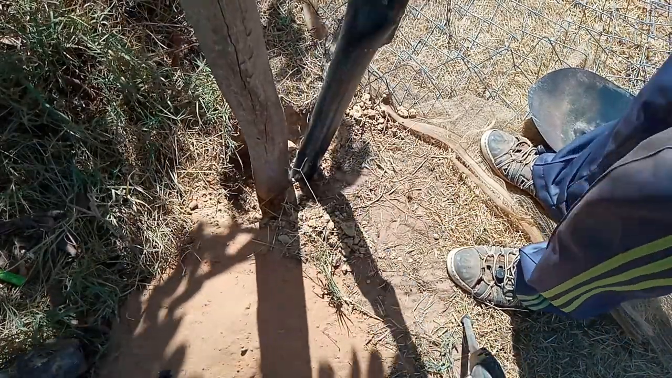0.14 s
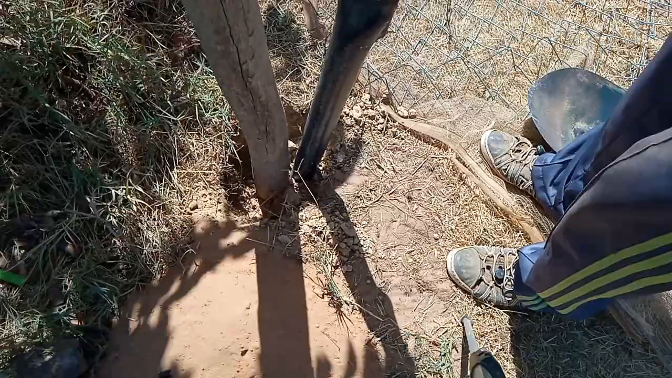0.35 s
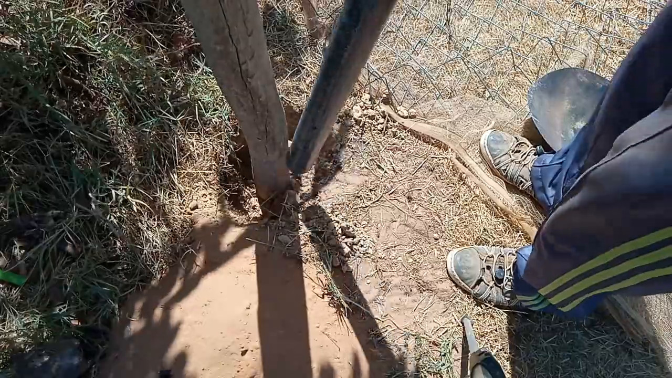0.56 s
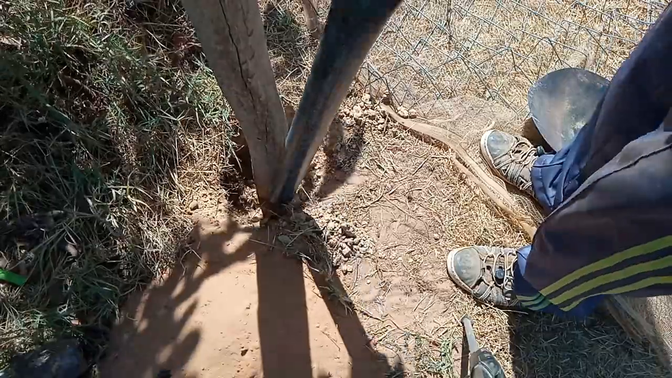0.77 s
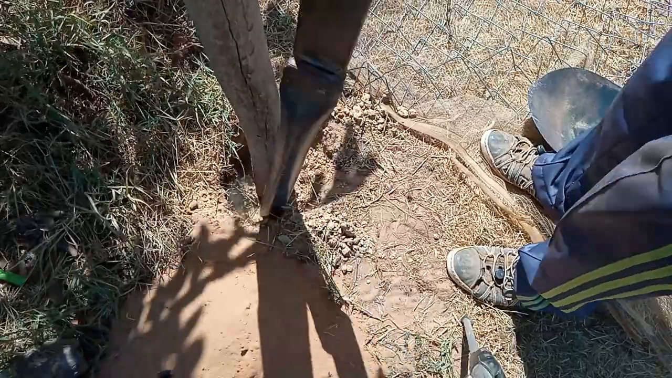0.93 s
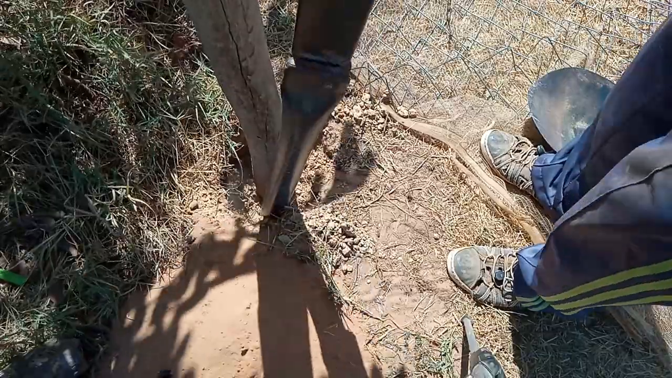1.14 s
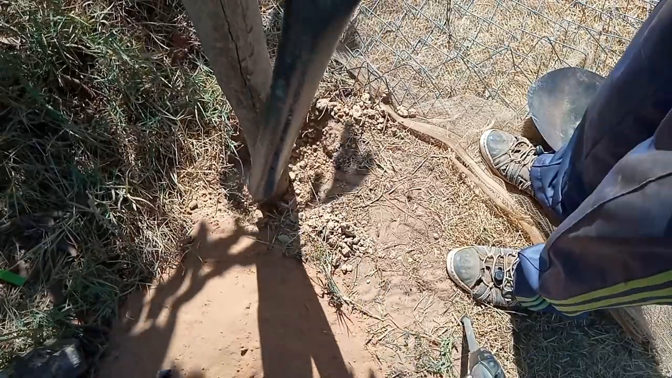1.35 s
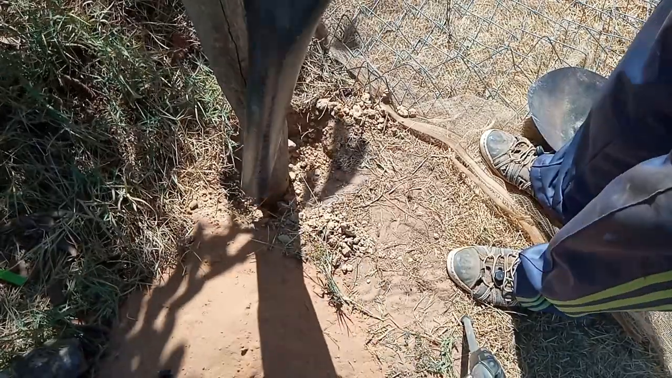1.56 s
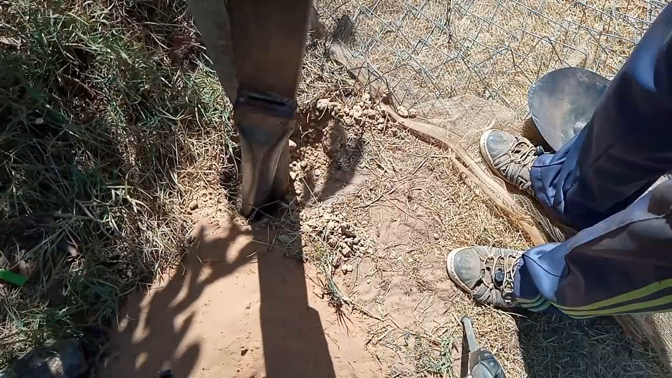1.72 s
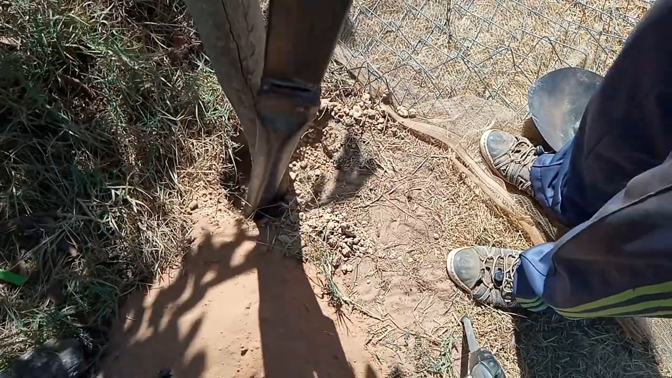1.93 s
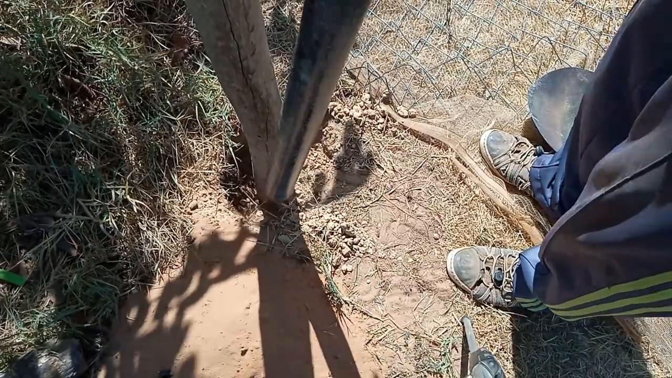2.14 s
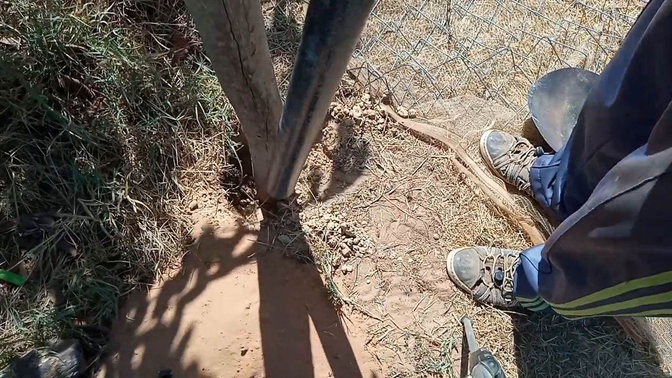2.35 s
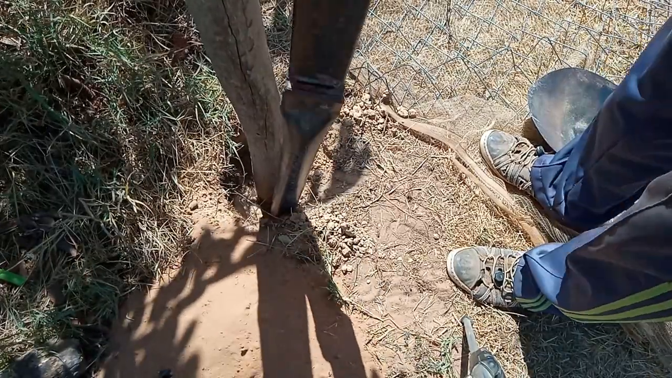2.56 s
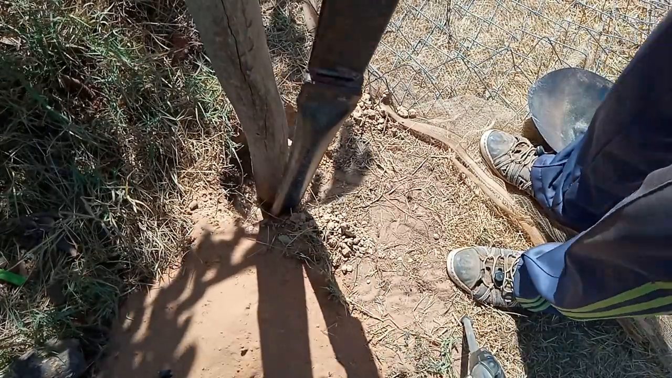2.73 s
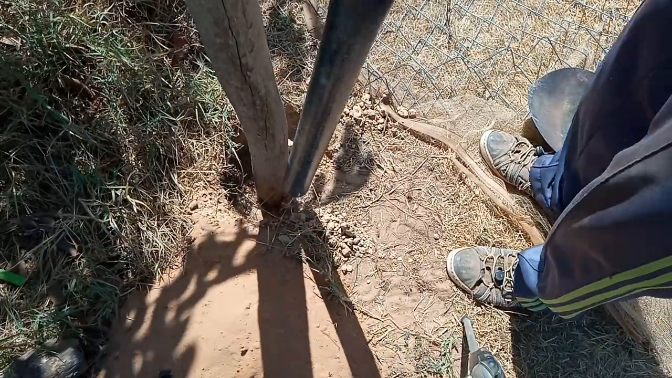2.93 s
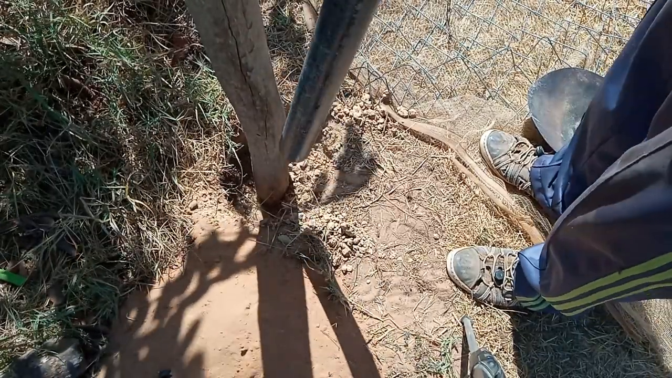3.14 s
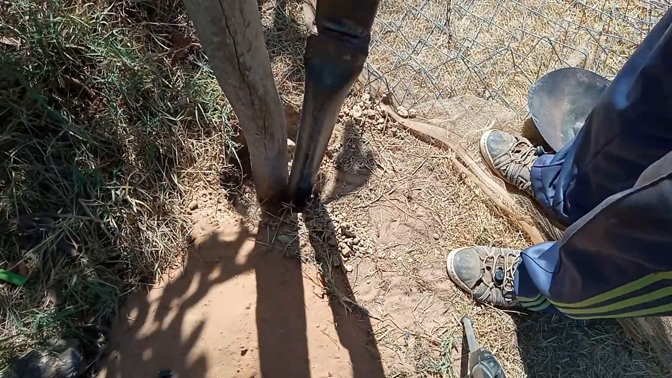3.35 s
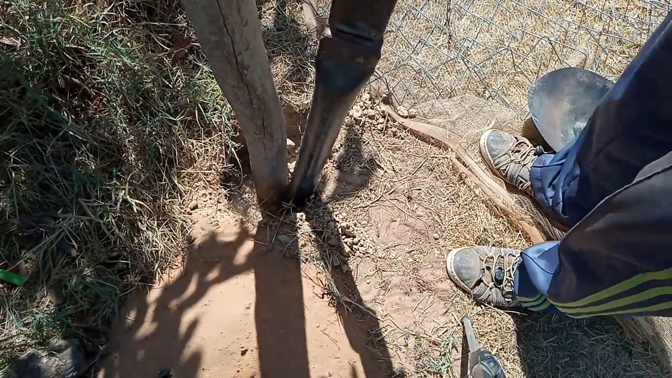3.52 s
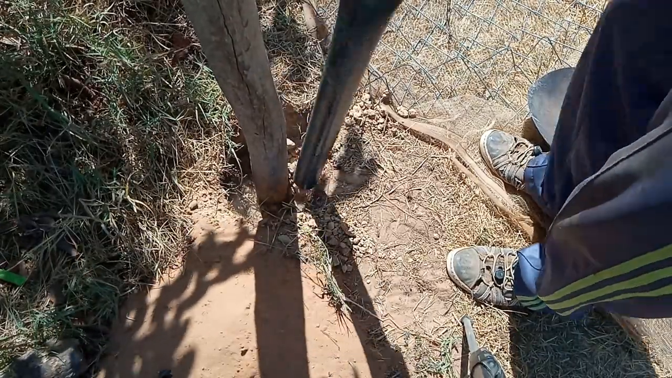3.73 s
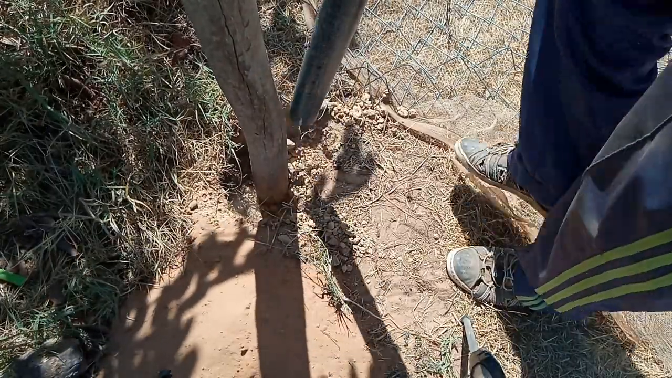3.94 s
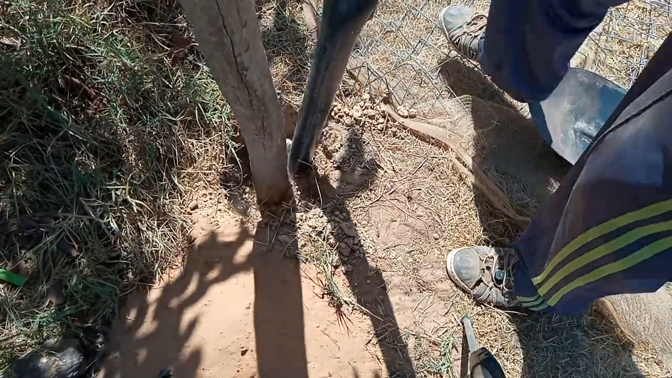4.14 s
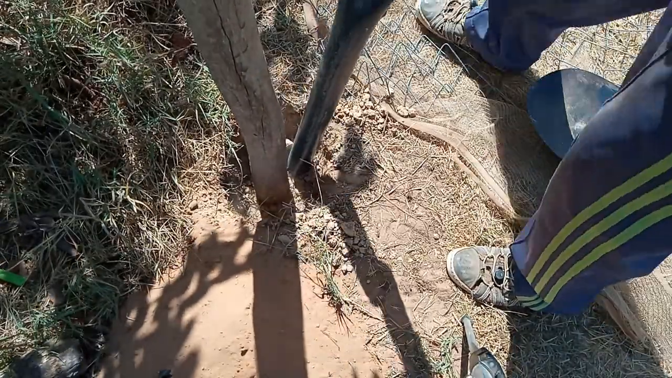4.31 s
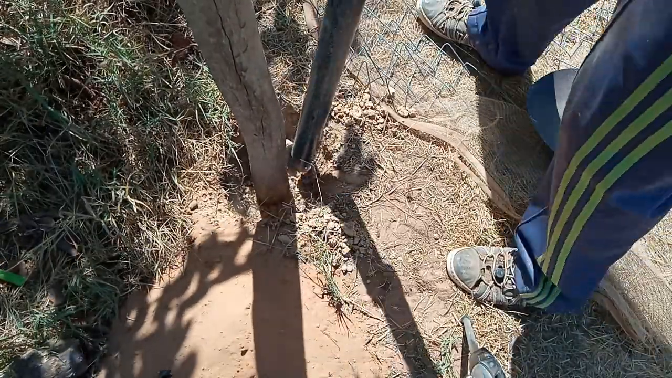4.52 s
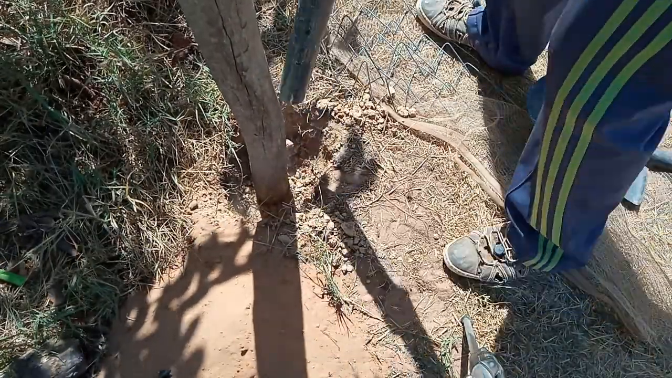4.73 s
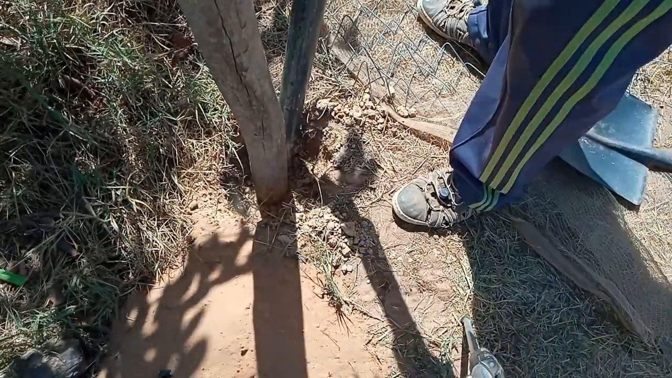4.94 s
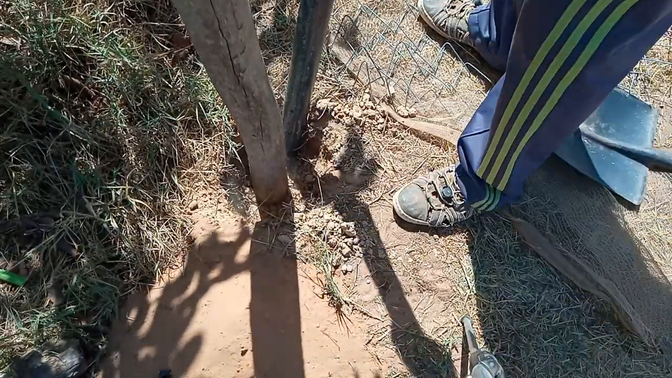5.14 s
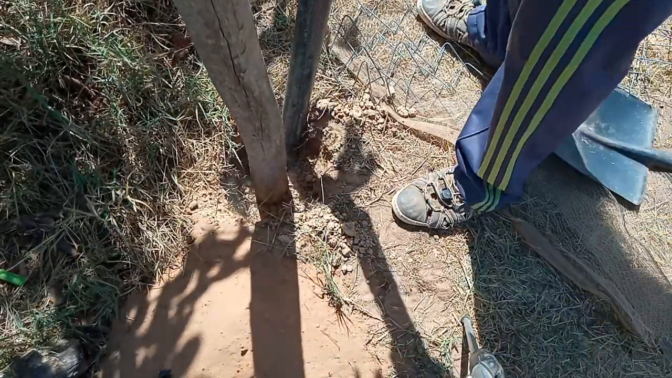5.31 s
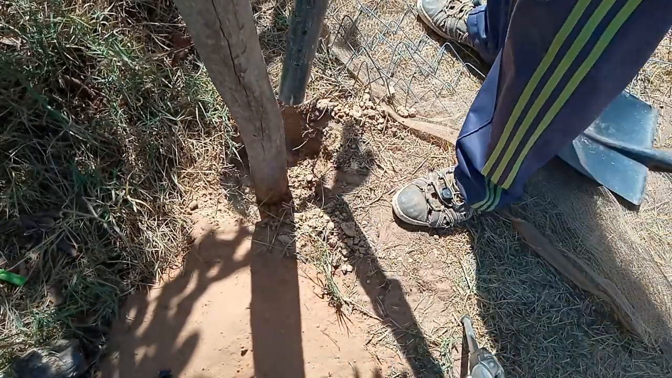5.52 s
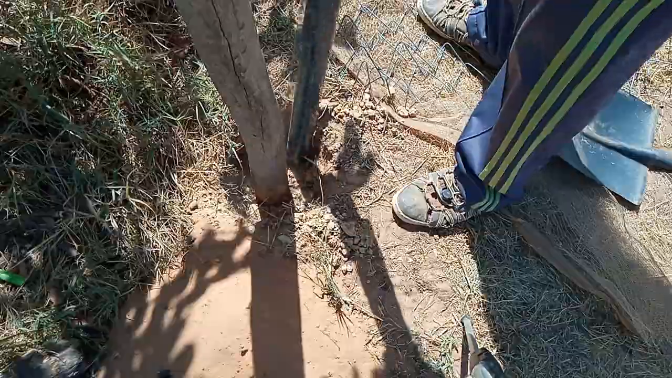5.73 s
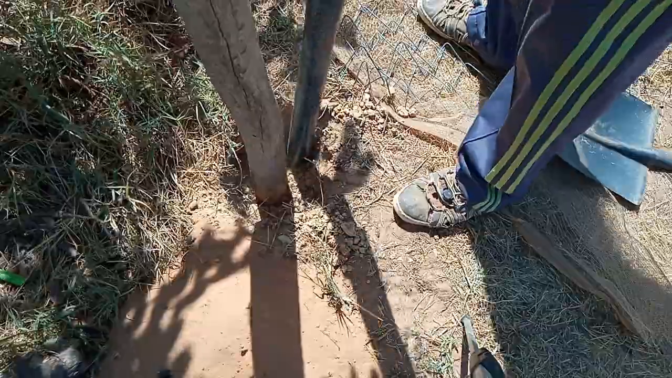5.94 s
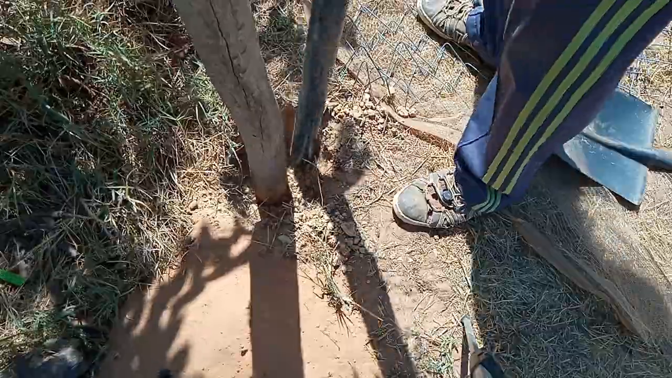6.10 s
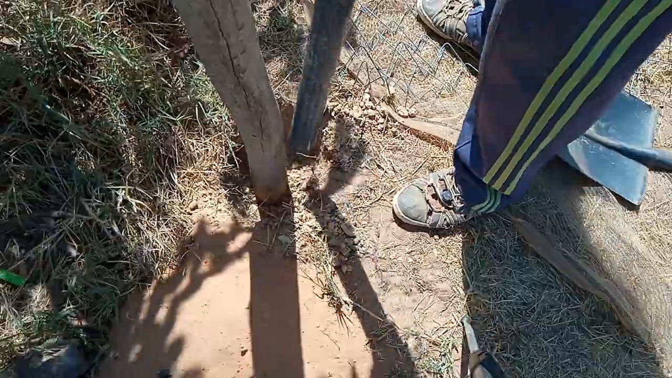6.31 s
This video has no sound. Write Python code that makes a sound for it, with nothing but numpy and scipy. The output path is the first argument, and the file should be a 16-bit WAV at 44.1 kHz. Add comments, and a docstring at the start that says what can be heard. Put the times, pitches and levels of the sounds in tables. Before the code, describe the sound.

Eight or so dry, crunchy metal-on-soil blows, some as quick doubles, land roughly every 0.8 seconds with almost no echo. Between them come soft gritty scrapes and tiny clicks. Lumpy wind thumps the microphone early and fades to calm. A rough warbler and fast falling trills open the scene, another trill follows near the middle, fainter ones later. A shoe scuffs a shovel along the ground after the fifth blow, over quiet grass hiss and a faint hum.

```python
"""Beside a wooden post in dry stony ground, a steel bar tamps the soil: filtered spiky noise rings its modes
and crunches. Blows crack and thud, a sharp tick sounds, tools and stones click, the bar scrapes on its way up,
a shoe drags a shovel in stuttering slides. Gliding sines make a trilling bird, a warbler and thin far whistles;
short wavelets and low noise buffet the microphone. Behind them lie a patchy noise hiss of grass and a narrow-
band far drone."""
import sys
import numpy as np
from scipy import signal
from scipy.fft import rfft, irfft, next_fast_len
from scipy.io import wavfile
from scipy.ndimage import uniform_filter1d, map_coordinates

SR = 44100
rng = np.random.default_rng(int(sys.argv[2]) if len(sys.argv) > 2 else 0)


def unload_audio(sound):
    """Save the sound as a 16-bit wav file, at the path given as the first command line argument."""
    columns = np.transpose(np.atleast_2d(sound))
    # keep every value between -1 and 1, then stretch to whole-number steps
    steps = np.round(np.clip(columns, -1, 1) * 32767)
    wavfile.write(sys.argv[1], SR, steps.astype(np.int16))


N = 280917  # length [samples]


def amp(db):
    """Decibels to gain."""
    return 10 ** (np.asarray(db) / 20)


def unit(x):
    """Scaled to rms 1."""
    return x / np.sqrt(np.mean(x ** 2) + 1e-20)


def along(points, hz):
    """Gain read from (frequency [Hz], level [dB]) points on a log frequency axis."""
    f, db = np.transpose(points)
    return amp(np.interp(np.log(hz + 1), np.log(f), db))


def curve(rows):
    """One value per sample from (time [s], value) rows."""
    return np.interp(np.arange(N) / SR, *np.transpose(rows))


def wobble(rate, size=N):
    """A smooth random curve with this many knots a second."""
    knots = rng.standard_normal(int(size * rate / SR) + 4)
    return map_coordinates(knots, [np.arange(size) * rate / SR])


def filtered(x, response):
    """Sound shaped by a real or complex response of frequency."""
    m = next_fast_len(len(x) + 8192)
    return irfft(rfft(x, m) * response(np.fft.rfftfreq(m, 1 / SR)), m)[:len(x)]


def add(out, s, x):
    """Mixes x into out from time s."""
    part = out[max(round(s * SR), 0):][:len(x)]
    part += x[:len(part)]


def third_of_a_second():
    """Time axis of one contact [s]."""
    return np.arange(SR // 3) / SR


MODE_SPREAD_DB = 2  # how much a mode's strength differs from contact to contact


def modes(table, f):
    """Causal resonances of alternating sign, at new strengths for each contact."""
    total = 0
    for k, (centre, width, db) in enumerate(table):
        strength = (-1) ** k * amp(db + rng.normal(0, MODE_SPREAD_DB))
        total = total + strength * 1j * f * width / (centre * centre - f * f + 1j * f * width)
    return total


FAVOUR_OCTAVES = 0.24  # half width of the lift or cut that the point of contact gives near one pitch
# spectrum of crunching soil: (frequency [Hz], relative level [dB])
SOIL_SPECTRUM = [(80, -8.5), (200, -16), (600, -12), (1500, -14.5), (3500, -19), (5000, -22.5), (8000, -25),
                 (11000, -46)]


def contact(shape, body, db, soil_db, tilt_db, grit, favoured_hz=1, favour_db=0):
    """Stones cracking against steel: spiky noise that rings the tool and is heard as crunch."""
    spikes = np.exp(grit * wobble(903, size=len(shape)))
    cracks = shape * unit(rng.standard_normal(len(shape)) * spikes)

    def heard(f):
        octaves_off = np.log2((f + 1) / favoured_hz)
        favour = favour_db * np.exp(-(octaves_off / FAVOUR_OCTAVES) ** 2)
        tilt = amp(tilt_db * np.log2(np.clip(f, 300, 5000) / 1700) + favour)
        radiated = 1 / (1 + (f / 5200) ** 4)  # far above the modes little is heard
        ring = amp(20.0) * modes(body, f) * radiated
        crunch = amp(soil_db + 13.5) * along(SOIL_SPECTRUM, f)
        return tilt * (ring + crunch)

    return amp(db) * filtered(cracks, heard)


BITE_S = .0004  # rise time constant [s]
CRACK, CRACK_S = 1.6, .003  # first crack over the crunch [ratio], and its decay time constant [s]


def grind(length):
    """Envelope of a bite: a sharp first crack, steady grinding, then a soft stop."""
    t = third_of_a_second()
    bite = 1 - np.exp(-t / BITE_S)
    crack = 1 + CRACK * np.exp(-t / CRACK_S)
    stop = 1 + np.exp(np.clip((t - length) / (0.1 * length + 0.0013), -50, 50))
    return bite * crack / stop


THUD_DB, THUD_HZ, THUD_T60 = -7.5, 179, 0.16  # level against the blow's force [dB], pitch [Hz], 60 dB decay [s]


def thud(db):
    """The ground's dull answer to a blow: decaying noise around a low pitch."""
    t = third_of_a_second()
    low = unit(filtered(rng.standard_normal(len(t)), lambda f: 1 / (1 + np.log2((f + 1) / THUD_HZ) ** 4)))
    return amp(db + THUD_DB - 60 * t / THUD_T60) * (1 - np.exp(-t / 0.011)) * low


GRIT = .42  # how spiky the crunch of a blow is
FADE_DB = 4  # a blow's crunch weakens by this much over its length [dB]
# ringing modes of the steel bar: (centre [Hz], width [Hz], relative level [dB])
BAR_MODES = [(560, 45, -19), (855, 41, -11.5), (1225, 25, -16.5), (1490, 33, -9), (1725, 37.5, -5.5),
             (1950, 55, -10), (2280, 53, -16.5), (2740, 63, -13), (3134, 49, -15), (3550, 36.5, -11.5),
             (4100, 31, -20.5)]
# bites of the bar, light touches and full blows: (time [s], force [dB], crunch length [s], share of soil [dB],
# treble slope [dB per octave], pitch lifted or damped [Hz], lift or damping [dB])
BAR_BLOWS = [(0.759, -21.5, 0.051, -15, -6, 1225, 10), (0.812, -6, 0.051, -3, -3, 3210, 5.5),
             (1.588, -19.5, 0.025, -14, -8.5, 1930, 3), (1.632, -15.5, 0.03, -5, -1, 1725, 8.5),
             (2.48, -2.5, 0.023, -5, -3.5, 3550, -2), (3.288, -7, 0.019, -3, -6, 1830, -13),
             (3.318, -7.5, 0.029, -3, -0.5, 1725, 5), (4.127, -6, 0.025, -4, -1, 3060, 12),
             (4.932, -30.5, 0.02, 12, -3, 855, 2), (4.955, -4.5, 0.024, -6, -1.5, 1980, -2.5),
             (5.695, -26, 0.042, 1.5, -6.5, 590, 7.5), (5.755, -20.5, 0.016, -8, 1, 1725, 7),
             (5.764, -7.5, 0.012, 1.5, -2, 2740, 12)]


def blows():
    """The bar bites the crust: each blow cracks, grinds, rings and thuds."""
    out, t = np.zeros(N), third_of_a_second()
    for s, db, length, soil_db, tilt_db, favoured_hz, favour_db in BAR_BLOWS:
        shape = grind(length) * amp(-FADE_DB * t / length)
        add(out, s, contact(shape, BAR_MODES, db, soil_db, tilt_db, GRIT, favoured_hz, favour_db))
        add(out, s, thud(db))
    return out


# the bar drawn up through loose soil: (middle [s], half length [s], force [dB])
BAR_SCRAPES = [(0.413, 0.15, -33.5), (1.122, 0.058, -29.5), (1.952, 0.093, -34), (2.804, .07, -28.5),
               (3.644, 0.1, -31)]


def scrapes():
    """The bar rubs past loose soil on its way up, swelling and fading."""
    out, t = np.zeros(N), third_of_a_second()
    for s, half, db in BAR_SCRAPES:
        swell = np.cos(np.pi / 2 * np.clip((t - half) / half, -1, 1))
        add(out, s - half, contact(swell, BAR_MODES, db, soil_db=-7.5, tilt_db=1.0, grit=0.23))
    return out


# small gritty clicks, a sharp tick first, then clicks of tools and stones: (time [s], force [dB], length [s])
GRITTY_CLICKS = [(0.459, -27, 0.002), (3.818, -44.5, 0.012), (4.531, -32, .003)]


def clicks():
    """Small gritty clicks: brief spiky noise with much soil in the sound."""
    out = np.zeros(N)
    for s, db, length in GRITTY_CLICKS:
        add(out, s, contact(grind(length), BAR_MODES, db, soil_db=10.5, tilt_db=2.0, grit=0.37))
    return out


JERK_S = 0.0035  # time constant of a slide's start [s]
# ringing modes of the shovel: (centre [Hz], width [Hz], relative level [dB])
SHOVEL_MODES = [(1110, 50, 4), (1740, 40, -5), (2130, 42, -6), (3560, 26, 2), (3980, 60, -5)]
# the shovel jerks and slides to rest: (time [s], length [s], force [dB])
SHOVEL_DRAGS = [(4.172, 0.095, -29.5), (4.22, 0.17, -28), (4.505, 0.093, -36.5)]


def drags():
    """A shoe drags the shovel: a quick start, then a stuttering slide that dies away."""
    out, t = np.zeros(N), third_of_a_second()
    for s, length, db in SHOVEL_DRAGS:
        slide = (1 - np.exp(-t / JERK_S)) * np.clip(1 - t / length, 0, 1) ** 0.88
        stutter = slide * amp(1.6 * wobble(56.3, size=len(t)))
        add(out, s, contact(stutter, SHOVEL_MODES, db, soil_db=7.5, tilt_db=2.0, grit=0.35))
    return out


EDDIES = 170  # weaker eddies, scattered through the whole time
EDDY_DB, EDDY_SPREAD_DB = 8.5, 3.5  # their strength over the buffet level and its scatter [dB]
EDDY_TOP_DB = -5  # ceiling of their strength [dB]
# buffeting: (time [s], level [dB])
BUFFET = [(0.0, -17.5), (0.39, -20), (0.67, -10), (.94, -16.5), (1.18, -7.5), (1.26, -19.5), (1.34, -12),
          (1.88, -20.5), (2.05, -14.5), (2.54, -28), (2.86, -40), (3.16, -42.5), (3.46, -20), (4.03, -23),
          (4.2, -40), (4.91, -48.5), (6.12, -40.5), (6.37, -22)]
# spectrum of the buffeting: (frequency [Hz], relative level [dB])
BUFFET_SPECTRUM = [(25, -34), (60, 4), (110, 6), (240, -11), (430, -50.5), (900, -79.5)]
# the strongest eddies slapping the port: (time [s], level [dB])
SLAPS = [(0.249, -1.5), (0.457, 1), (0.572, -1), (0.73, 2.5), (.982, 0), (1.002, 2), (1.08, 0.5),
         (1.114, 0), (1.143, 0), (1.182, 6), (1.295, 2.5), (1.313, 2.5), (1.361, 1), (1.402, 0),
         (1.443, -5.5), (1.493, 0.5), (1.763, -0.5), (2.074, 0), (2.135, -2), (2.219, -4.5), (2.274, -6),
         (3.864, -8.5), (6.228, -9.5)]


def wind():
    """Lumpy turbulence at the port, with single eddies as short wavelets, tending quicker and sharper when strong."""
    buffet_db, lumps = curve(BUFFET), amp(4.73 * wobble(25))
    rumble = filtered(rng.standard_normal(N), lambda f: along(BUFFET_SPECTRUM, f))
    out = amp(buffet_db) * unit(lumps * rumble)
    # strong gusts flutter higher
    flutter = filtered(rng.standard_normal(N), lambda f: f / 380 / (1 + (f / 380) ** 6.2))
    out += amp(2.26 * buffet_db + 3) * unit(lumps ** 1.5 * flutter)
    # one eddy at a random place in each equal slot
    at = ((np.arange(EDDIES) + rng.random(EDDIES)) * N / EDDIES).astype(int)
    eddy_db = buffet_db[at] + EDDY_DB + EDDY_SPREAD_DB * rng.standard_normal(EDDIES)
    weak = zip(at / SR, np.minimum(eddy_db, EDDY_TOP_DB))
    t = np.arange(SR // 8) / SR
    for s, db in [*SLAPS, *weak]:
        pace, side = rng.standard_normal(2)
        hz = 200 * amp(0.31 * db + 1.62 * pace)
        rise = (1 - np.exp(-t * hz * 6.23 * amp(0.3 * db))) ** 2
        swirl = np.sin(2 * np.pi * hz * t / (1 + 9 * t))  # it loses speed
        decay = np.exp(-.62 * hz * t)
        rough = amp(2.97 * wobble(500, size=len(t)))
        add(out, s, np.sign(side) * amp(db) * rise * swirl * decay * rough)
    return out


def tone(rows, overtones_db, flutter_db, hoarse):
    """A gliding whistle with weak overtones near its top, unsteady in level and pitch."""
    s, hz, db = np.transpose(rows)
    t = np.arange(s[0], s[-1], 1 / SR)
    pitch = np.interp(t, s, hz) * (1 + hoarse * wobble(1100, size=len(t)))
    phase = 2 * np.pi * np.cumsum(pitch) / SR
    overtones = sum(amp(o) * np.sin((k + 2) * phase) for k, o in enumerate(overtones_db))
    near_top = np.clip(8 * (pitch / max(hz) - .76), 0, 1)
    wave = np.sin(phase) + near_top * overtones
    edge = np.clip(np.minimum(t - s[0], s[-1] - t) / 0.0028, 0, 1)
    level = amp(np.interp(t, s, db) + flutter_db * wobble(138.5, size=len(t)))
    return np.sqrt(2) * wave * edge * level


def trill(shape, start, gap, slowing, db, overtones_db=(), hoarse=0.018, count=1):
    """One note repeated, its gaps lengthening when slowing is above zero; the first note is timid."""
    out = np.zeros(N)
    for k in range(count):
        note = tone(shape, overtones_db, flutter_db=3.5, hoarse=hoarse)
        when = start + shape[0][0] + gap * k + slowing * k * k
        add(out, when, amp(db - 2.3 * (k == 0)) * note)
    return out


# trill timing: first note [s], gap [s], slowing [s per note squared]
FIRST, SECOND, THIRD = (.031, .0755, .0009), (1.513, .0712, .0003), (5.921, .0705, .0004)
QUICK = (4.437, .0585, .00038)
LEAD_IN, AFTER, LATE = (1.21, .075, 0), (2.54, .085, 0), (5.365, .085, 0)  # faint trills
SMEAR = .016  # hoarseness of the quick trill
# falling note: (time after the start [s], pitch [Hz], relative level [dB])
FALLING_NOTE = [(0, 4100, -8), (.008, 3870, -9), (.014, 3430, 0.5), (.021, 3220, 1), (.028, 2800, -3.5),
                (.04, 2320, -21.5)]
# arching note: (time after the start [s], pitch [Hz], relative level [dB])
ARCHING_NOTE = [(0, 2750, -4), (.007, 3300, -3), (.011, 3540, -4.5), (.012, 4156, -20.5),
                (.017, 3600, -3.5), (.023, 3675, -6.5), (.031, 2830, -1.5), (.04, 2773, -3.5)]
# note that dips, then rises: (time after the start [s], pitch [Hz], relative level [dB])
RISING_NOTE = [(0, 5500, 12), (.007, 5200, 2), (.012, 3450, 6.5), (.022, 6500, 8), (.033, 7800, 3.5),
               (.052, 7700, -3.5)]
# faint smeared 13 kHz line sounding along with the quick trill:
# (time after the start [s], pitch [Hz], relative level [dB])
HIGH_LINE = [(.012, 13900, 1), (.054, 13200, -11)]


def trills():
    """Trills near and far, each a gliding note shape repeated briskly, and a faint high line along with the quick one."""
    out = trill(FALLING_NOTE, *FIRST, db=-32, overtones_db=(-24, -22), count=7)
    out += trill(ARCHING_NOTE, *SECOND, db=-32, hoarse=0.034, overtones_db=(-18, -20), count=11)
    out += trill(ARCHING_NOTE, *THIRD, db=-31.5, hoarse=.025, overtones_db=(-18, -20), count=7)
    out += trill(RISING_NOTE, *QUICK, db=-49, overtones_db=(-15,), hoarse=SMEAR, count=12)
    out += trill(HIGH_LINE, *QUICK, db=-53.5, hoarse=0.044, count=12)
    out += trill(FALLING_NOTE, *LEAD_IN, db=-49.5, count=4)
    out += trill(FALLING_NOTE, *AFTER, db=-47.5, count=3)
    out += trill(FALLING_NOTE, *LATE, db=-49.5, count=4)
    return out


HOARSE, STEADY_S = 0.047, 0.06  # roughness of short notes [share of pitch]; it fades for notes longer than this [s]
# warbled notes: (time [s], length [s], from pitch [Hz], to pitch [Hz],
# slur time constant [s], negative when the note bends away at its end, level [dB])
WARBLED_NOTES = [(0.073, 0.036, 1544, 2200, 0.0072, -29), (0.109, 0.04, 1414, 2145, 0.01, -27.5),
                 (0.406, 0.072, 3110, 2434, 0.0062, -20.5), (0.577, 0.047, 1315, 2440, 0.0085, -31.5),
                 (0.62, 0.017, 1860, 1700, 0.006, -30), (0.636, 0.059, 1900, 2924, 0.013, -24.5),
                 (0.684, 0.028, 2930, 1695, .025, -23), (0.718, 0.071, 2086, 2121, -.026, -25.5)]


def warbler():
    """Single notes slur exponentially in pitch; short ones are rough."""
    out = np.zeros(N)
    for s, length, from_hz, to_hz, slur, db in WARBLED_NOTES:
        t = np.linspace(0, length, 16)
        pitch = to_hz + (from_hz - to_hz) * np.exp(-t / slur)
        note = np.transpose([t, pitch, db + 0 * t])
        hoarse = HOARSE / (1 + (length / STEADY_S) ** 4)
        add(out, s, tone(note, (), flutter_db=4, hoarse=hoarse))
    return out


# thin far whistles: (time [s], length [s], from pitch [Hz], to pitch [Hz], level [dB])
FAR_WHISTLES = [(2.027, 0.21, 1896, 1906, -49.5), (2.782, .1, 9140, 6560, -68)]


def whistles():
    """Thin far whistles glide straight from one pitch to another."""
    out = np.zeros(N)
    for s, length, from_hz, to_hz, db in FAR_WHISTLES:
        glide = [(0, from_hz, db), (length, to_hz, db)]
        add(out, s, tone(glide, (), flutter_db=5.5, hoarse=0.0019))
    return out


def trees(x, t60):
    """A short scattered answer from trunks and ground: x convolved with decaying noise."""
    t = third_of_a_second()
    tail = rng.standard_normal(len(t)) * amp(-60 * t / t60) * (t > .006)
    return signal.fftconvolve(x, tail / np.linalg.norm(tail))[:N]


# grass hiss: (time [s], level [dB])
HISS_LEVEL = [(0, -42), (.8, -43), (1.3, -49.5), (1.6, -46), (3.5, -45), (4.2, -42.5), (5, -42),
              (6.37, -46)]
# spectrum of the hiss: (frequency [Hz], relative level [dB])
HISS_SPECTRUM = [(45, -29), (100, 4.5), (300, -13), (600, -6), (1500, -7), (3100, -4.5), (4300, -15),
                 (5400, -17.5), (8000, -17), (9500, -26.5)]


def grass():
    """Patchy hiss: noise whose level varies smoothly over time and frequency."""
    z = signal.stft(rng.standard_normal(N + 512), nperseg=512)[2]
    patches = uniform_filter1d(rng.standard_normal(z.shape), size=5, axis=0)
    patches = uniform_filter1d(patches, size=8, axis=1)
    noise = signal.istft(z * amp(3.7 * unit(patches)), nperseg=512)[1][:N]
    return amp(curve(HISS_LEVEL)) * unit(filtered(noise, lambda f: along(HISS_SPECTRUM, f)))


# a low hum swells and fades: (time [s], level [dB])
DRONE_LEVEL = [(4.1, -46), (4.3, -36), (4.85, -36), (5.1, -44)]


def drone():
    """A far hum: narrow-band noise around 66 Hz, which wavers by itself."""
    hum = unit(filtered(rng.standard_normal(N), lambda f: 1 / (1 + ((f - 66) / 4) ** 4)))
    return amp(curve(DRONE_LEVEL)) * hum


def scene():
    """All sources at one microphone, tools and birds with their short echoes."""
    steel = blows() + scrapes() + clicks() + drags()
    song = trills() + warbler() + whistles()
    near = steel + amp(-18.5) * trees(steel, t60=0.093)
    far = song + amp(-6.0) * trees(song, t60=0.091)
    return (near + far + wind() + grass() + drone())[None]


TOP_HZ = 15830  # band limit [Hz]
# the case dulls the treble: (frequency [Hz], level [dB])
CASE_RESPONSE = [(4400, 0), (6000, -12)]


def record(dry):
    """The microphone cuts deep bass, peaks flatten near full scale, the case dulls the treble up to a band limit."""
    port = filtered(dry[0], lambda f: (1j * f / (52 + 1j * f)) ** 2)
    held = port / (1 + np.abs(port / .99) ** 8) ** (1 / 8)
    return filtered(held, lambda f: (f < TOP_HZ) * along(CASE_RESPONSE, f))[None]


dry = scene()
out = record(dry)
unload_audio(out)
```